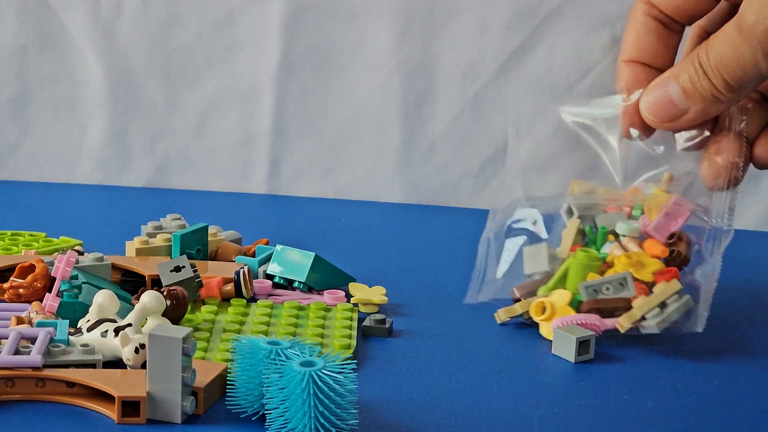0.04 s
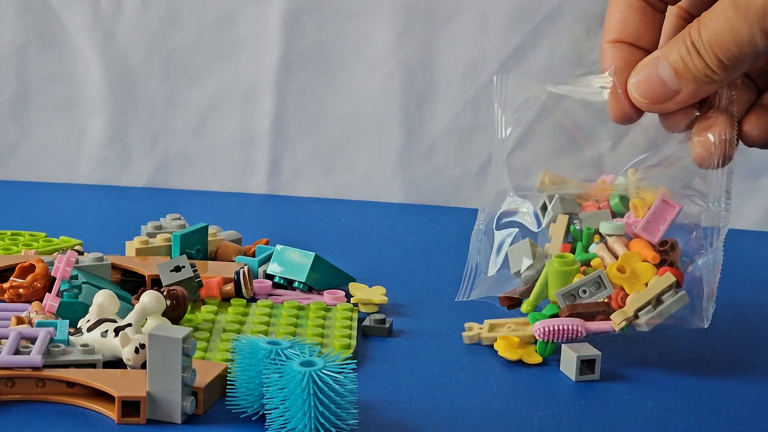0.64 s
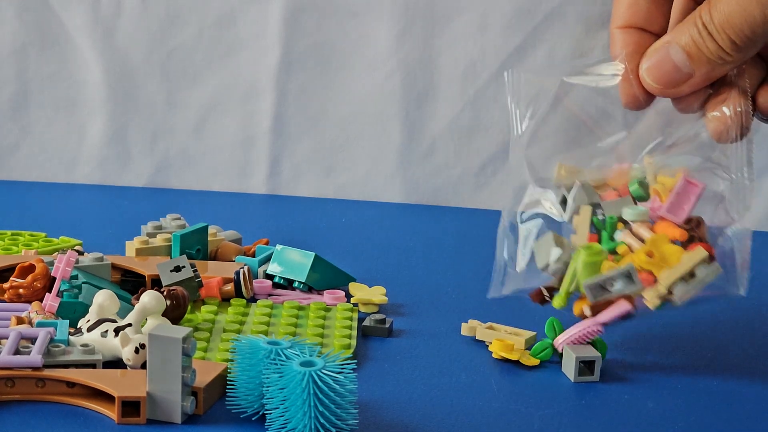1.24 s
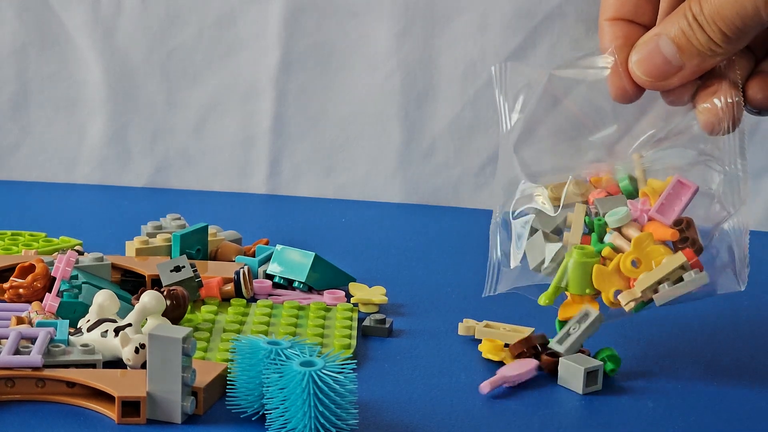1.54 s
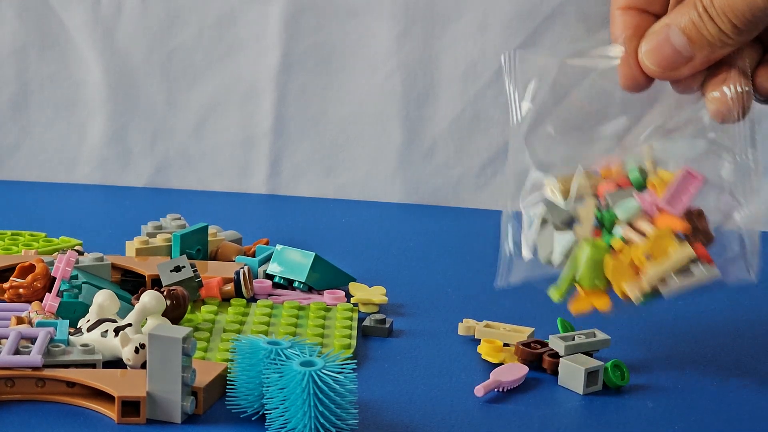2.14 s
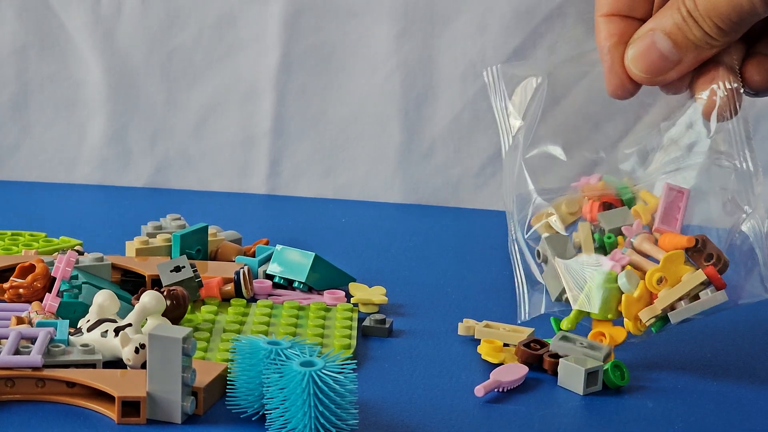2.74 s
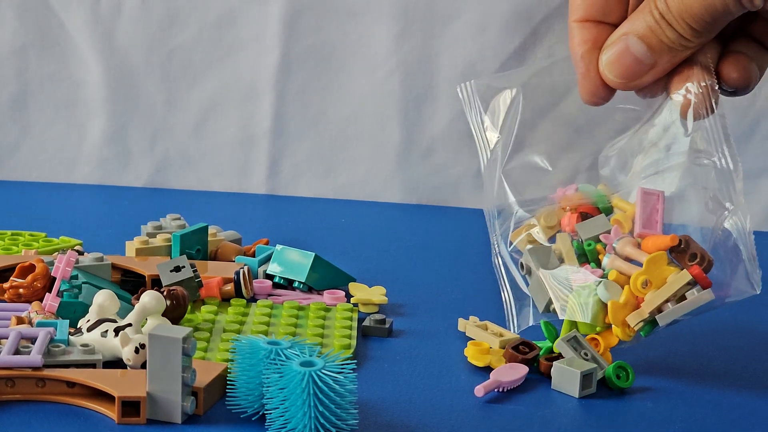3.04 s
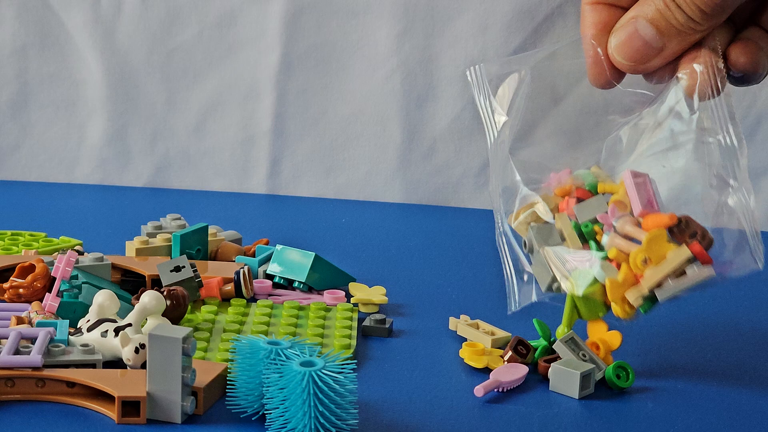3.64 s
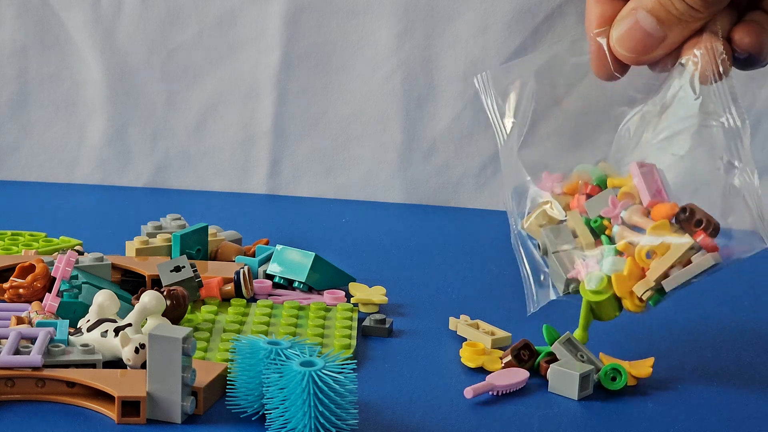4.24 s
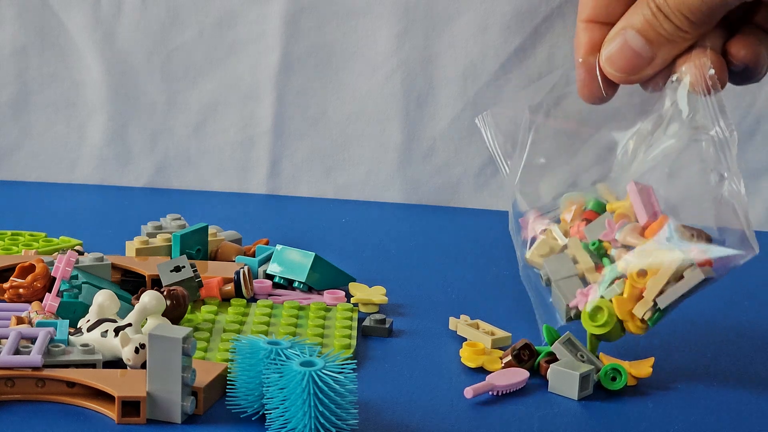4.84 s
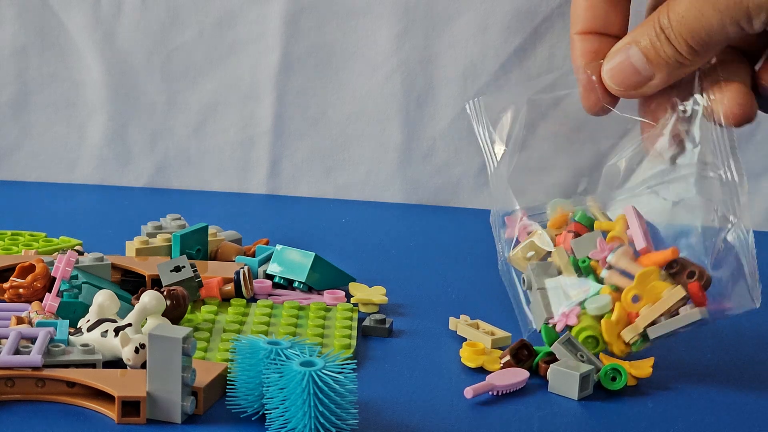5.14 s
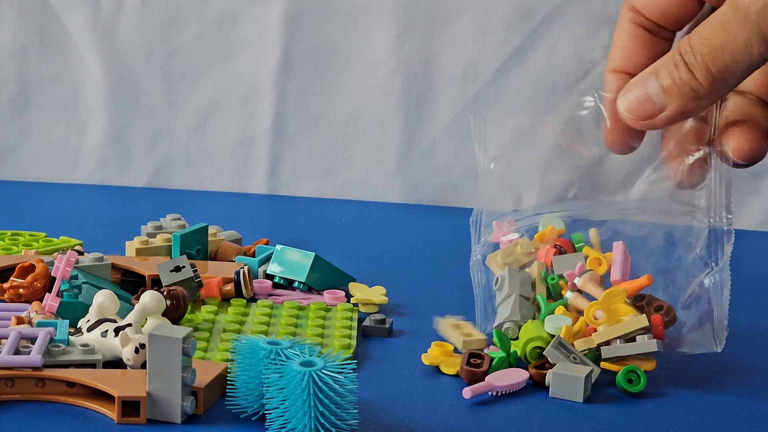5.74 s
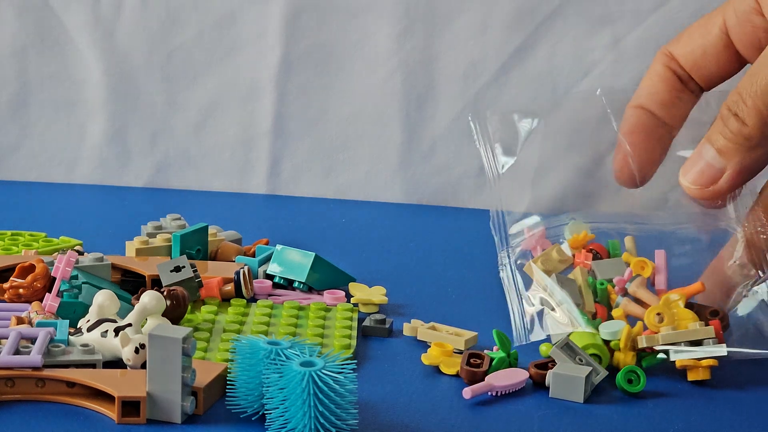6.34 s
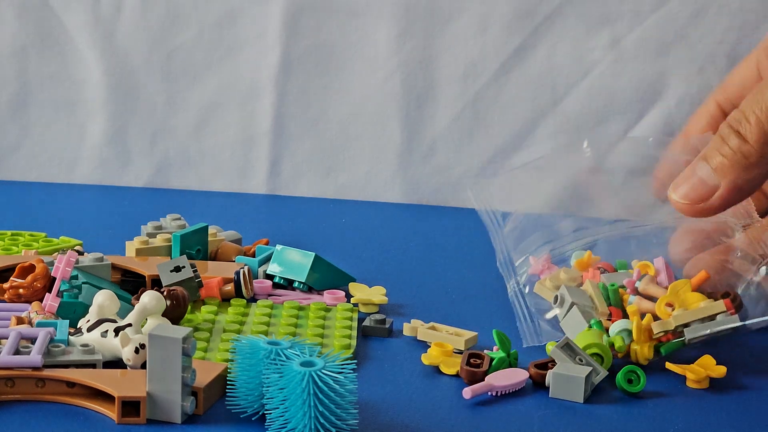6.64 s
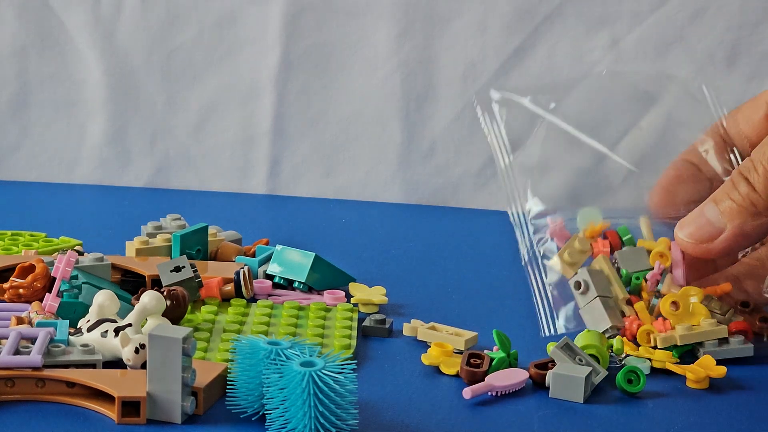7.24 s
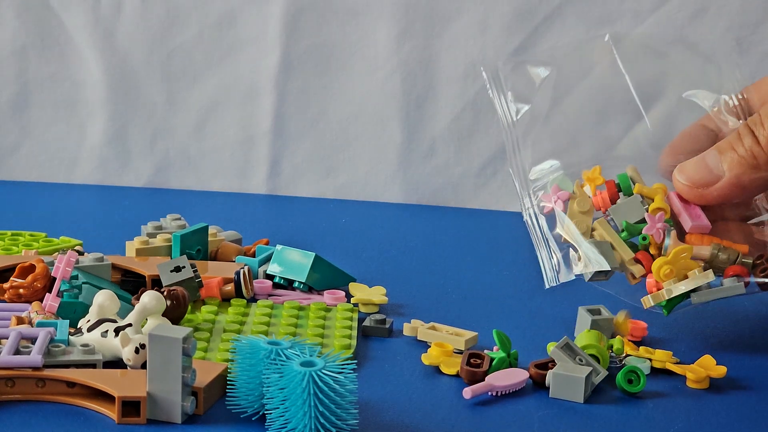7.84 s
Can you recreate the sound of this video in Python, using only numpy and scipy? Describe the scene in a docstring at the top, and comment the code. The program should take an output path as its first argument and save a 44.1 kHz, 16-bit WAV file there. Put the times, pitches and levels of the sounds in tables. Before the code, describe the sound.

Close by, small plastic bricks shift and rattle in a thin bag as it is repeatedly shaken. Pieces spill onto a tabletop a few at a time, with crisp clicks and an occasional soft thud. Sharp crackles from the bag run throughout and grow busier in the second half, before more bricks tumble out. The small room adds a short echo over a steady low rumble and faint hum.

```python
"""A soft rustle starts over a low room rumble and faint hum: a thin plastic bag of toy bricks is being
shaken out just above a tabletop in a small room. Bricks slide and jostle inside, and creases in the film
buckle with sharp snaps. A few bricks drop out and clack with a short ring, twice with a bright treble
sparkle; the load bumps dully on the table, and thin, very high whistles sound during the clatter.
The room adds an early echo and a short diffuse tail."""
import sys
import numpy as np
from scipy import signal
from scipy.fft import rfft, irfft, next_fast_len
from scipy.io import wavfile
from scipy.ndimage import uniform_filter1d

SR = 44100
rng = np.random.default_rng(int(sys.argv[2]) if len(sys.argv) > 2 else 0)


def digitize_waveform(pressure):
    """Quantize a signal to 16-bit integers and store it at the path in sys.argv[1].

    Rows of a 2-D input are taken as channels; values are limited to [-1, 1].
    """
    field = np.atleast_2d(pressure).T
    bounded = np.clip(field, -1, 1)
    quanta = np.round(bounded * 32767).astype(np.int16)
    wavfile.write(sys.argv[1], SR, quanta)


N = 351918
TIME = np.arange(N) / SR

# spectrum of the room's rumble: (frequency [Hz], relative level [dB])
RUMBLE_SPECTRUM = [(16, -10), (30, 1.5), (100, -13), (290, -12.5), (370, -19), (1000, -32.5), (4500, -50.5),
                   (16000, -74)]
# partials of the hum: (frequency [Hz], rms level [dB])
HUM_PARTIALS = [(120, -61.5), (299.5, -58.5)]
# the hand shakes or shifts the bag:
# (time [s], duration [s], level [dB], loose bricks re level [dB], taut film re level [dB])
HAND_SHAKES = [(0.01, 0.059, -42, -2.5, -19), (0.141, 0.043, -37.5, -6, -20),
               (0.278, 0.0098, -40.5, -0.5, -17), (0.47, 0.078, -36.5, 0.5, -11),
               (0.665, 0.074, -38, -4, -24.5), (1.258, 0.12, -43, -0.5, -14),
               (1.462, 0.14, -32.5, -1.5, -13), (1.685, 0.013, -35.5, -6, -16),
               (2.244, 0.046, -53, 5, -3.5), (2.402, 0.12, -60, -7, -4.5), (2.619, 0.29, -39.5, -3, -14.5),
               (3.013, 0.28, -51.5, 2, -42), (3.347, 0.078, -40.5, -5, -30.5), (3.5, 0.17, -50, -5, -34),
               (3.685, 0.056, -40.5, -3.5, -12.5), (3.826, 0.056, -35.5, -6.5, -17.5),
               (4.069, 0.04, -39.5, -7, -16), (4.854, 0.0093, -43, -11, -14), (5.083, 0.12, -36, -4, -12.5),
               (5.288, 0.03, -36, -5.5, -11.5), (5.366, 0.08, -31.5, -8, -14),
               (5.77, 0.086, -35.5, -8.5, -20), (5.954, 0.14, -38.5, -29, -18),
               (6.24, 0.26, -41.5, -29, -25.5), (6.731, 0.3, -41.5, -5.5, -9),
               (6.973, 0.2, -41, -10.5, -12), (7.194, 0.44, -52.5, -30, -19), (7.594, 0.028, -29, -18, -16),
               (7.71, 0.22, -44.5, -10, -11.5)]
# spectra of sliding bricks and of crinkling film: (frequency [Hz], gain [dB])
SLIDE_SPECTRUM = [(130, -26), (240, 11.5), (640, 2.5), (1150, 3), (1650, -4), (2150, 1), (2600, -0.5),
                  (4300, -2), (7500, -20)]
CRINKLE_SPECTRUM = [(2000, -2), (5200, 6), (7300, 5), (9600, -10.5), (12000, 5), (16000, -10)]
# a brick's ring, then two faint high treble tones heard with each contact:
# (frequency [Hz], level [dB], t60 [s])
CONTACT_TONES = [(3647, 3.5, 0.013), (4140, -6.5, 0.011), (5290, -0.5, 0.0044), (11500, -21.5, 0.024),
                 (15400, -28, .008)]
# low modes of the hollow heap of bricks and the tabletop: (frequency [Hz], level [dB], t60 [s])
BODY_MODES = [(232, -6, 0.1), (439, -8, 0.079), (1030, 4.5, 0.015), (1331, -11, 0.086), (2066, 3.5, 0.021)]
# crease snaps; the two rows above 10 kHz are bright treble sparkles on brick clacks:
# (time [s], level [dB], ring frequency [Hz], body trim [dB], crack trim [dB])
SNAPS_AND_SPARKLES = [(0.2121, -36, 4940, -28, 3), (0.352, -30, 3620, -29, -12),
                      (0.386, -38.5, 2290, -0.5, -13), (0.442, -25.5, 3800, -9, -14),
                      (0.4545, -14.5, 3250, -39, -13.5), (0.7741, -23.5, 3960, -21.5, -11),
                      (1.5765, -21, 3660, -15, -14.5), (1.6843, -29.5, 14100, -22, -9),
                      (2.4017, -38.5, 4850, -37, -9.5), (2.6324, -22.5, 4470, -13.5, -16.5),
                      (2.812, -22, 3730, -10.5, -15), (3.0665, -20.5, 3170, -15.5, -11.5),
                      (3.084, -34.5, 3530, -11, -2), (3.4094, -14.5, 3380, -21, -19),
                      (4.024, -30, 3640, -20.5, -17), (4.191, -31.5, 3860, -13, -17.5),
                      (4.75, -33.5, 4640, -21.5, -19), (4.968, -38, 3300, -17, -20),
                      (4.995, -28, 5300, -26, -18), (5.213, -26, 3400, -38, -11),
                      (5.2629, -22.5, 5750, -19, -6.5), (5.374, -30, 5000, -27, -11),
                      (5.4374, -15.5, 3380, -21, -17), (5.467, -26.5, 5000, -20, -12.5),
                      (5.752, -28, 3930, -16.5, -11), (5.87, -27, 5400, -10.5, -3),
                      (5.9545, -19.5, 4500, -18.5, -26), (5.9592, -16.5, 3620, -16.5, -13),
                      (6.0249, -28.5, 3600, -9.5, -22), (6.07, -23, 4200, -30, -3.5),
                      (6.1213, -29, 2750, -4.5, -9), (6.138, -20.5, 3840, -24, -9),
                      (6.369, -28.5, 6400, -11, -7), (6.6076, -8, 4420, -19.5, -20.5),
                      (6.799, -25.5, 3830, -25, -26), (6.8533, -30.5, 4200, -17, -11.5),
                      (6.966, -26.5, 4970, -16, -11), (6.9696, -11.5, 4600, -19.5, -18),
                      (7.0911, -30, 6800, -21, -17), (7.1217, -24.5, 2900, -15.5, -15),
                      (7.2699, -27, 4680, -14, -17), (7.375, -22, 3700, -12, -10.5),
                      (7.451, -29.5, 4430, -8.5, -9.5), (7.5715, -27, 3580, -4.5, -6.5),
                      (7.602, -29.5, 5270, 0, 1.5), (7.8979, -24, 12000, -22, -6.5)]
# a brick comes down on the table: (time [s], level [dB])
BRICK_LANDINGS = [(0.2698, -34), (0.484, -33), (1.433, -33), (1.462, -25.5), (1.5269, -24), (2.697, -33),
                  (2.8648, -30.5), (3.678, -36.5), (3.708, -32.5), (4.0648, -29), (7.5894, -20)]
# the load bumps the table: (time [s], level [dB], centre frequency [Hz])
LOAD_BUMPS = [(0.475, -11.5, 282), (1.503, -16, 240), (4.305, -10.5, 100), (4.391, -17.5, 64.5),
              (5.112, -9.5, 264), (7.589, -19, 295)]
# a brick knocks on another: (time [s], level [dB])
BRICK_CLACKS = [(0.831, -48), (0.9719, -36.5), (1.0146, -39.5), (1.046, -21.5), (1.0564, -32),
                (1.227, -30.5), (1.2525, -25.5), (1.3438, -30.5), (1.3508, -28.5), (1.4785, -21),
                (1.5097, -19.5), (1.569, -32.5), (1.6843, -22.5), (1.7007, -31.5), (2.13, -38),
                (2.16, -35.5), (2.607, -31.5), (2.6751, -33.5), (2.737, -20), (3.1497, -40.5),
                (3.2331, -44), (3.2665, -46), (3.3432, -39), (3.4993, -33.5), (3.616, -38), (7.723, -34.5),
                (7.7674, -30), (7.782, -29.5), (7.832, -21.5), (7.8964, -24.5), (7.919, -35)]
# thin, very high whistles during the clatter: (time [s], level [dB], centre frequency [Hz])
HIGH_WHISTLES = [(1.477, -7, 15400), (1.686, -19, 15400), (2.401, -18, 11800), (2.494, -24, 12200),
                 (3.86, -22, 12000), (4.785, -29.5, 7360)]
# left-right coherence of the direct sound and of the room: (frequency [Hz], coherence [0-1])
BAG_COHERENCE = [(3500, 0.77), (6000, 0.75), (9000, 0.024)]
ROOM_COHERENCE = [(200, 0.95), (850, 0.12), (3000, 0)]
# stereo balance of the bag's sound: (frequency [Hz], left minus right [dB])
BAG_BALANCE = [(1000, -3), (5000, -3.5), (9000, -4), (13000, -1.5)]
# the bag is moved to the right and back: (time [s], added left minus right [dB])
BAG_PATH = [(6.2, 6), (6.6, 2.5), (7.6, 5.2)]
# reflection from a near surface: (delay [s], level [dB])
EARLY_ECHOES = [(0.0098, -11)]
# reverberation time: (frequency [Hz], t60 [s])
TAIL_DECAY = [(3700, 0.26), (12000, 0.09)]
# strength of the diffuse tail: (frequency [Hz], gain [dB])
TAIL_GAIN = [(3700, 2.23), (12000, 2.8)]


def from_db(db):
    """Amplitude ratio of a level in decibels."""
    return 10 ** (np.asarray(db) / 20)


def decay(t, t60):
    """Exponential damping: the amplitude falls 60 dB in t60 seconds."""
    return from_db(-60 * t / t60)


def rms_one(x):
    """Normalisation to unit mean power."""
    return x / np.sqrt(np.mean(x ** 2) + 1e-20)


def unit_energy(x):
    """Normalisation of a transient to unit energy."""
    return x / np.sqrt(np.sum(x ** 2) + 1e-20)


def at_hz(points, hz):
    """Interpolation of a table on a log-frequency axis."""
    freqs, values = np.transpose(points)
    return np.interp(np.log(hz + 1e-9), np.log(freqs), values)


def colour(x, spectrum):
    """Minimum-phase filtering: folding the cepstrum makes the given spectrum causal."""
    size = next_fast_len(N + SR // 4)
    gain = from_db(at_hz(spectrum, np.fft.rfftfreq(size, 1 / SR)))
    cepstrum = irfft(np.log(gain), size)
    cepstrum[1:size // 2] *= 2
    cepstrum[size // 2 + 1:] = 0
    return irfft(rfft(x, size) * np.exp(rfft(cepstrum)), size)[..., :N]


def spread(pair, coherence, balance=((1000, 0),)):
    """Partial coherence: two uncorrelated signals mix as mid and side into left and right."""
    size = next_fast_len(N)
    hz = np.fft.rfftfreq(size, 1 / SR)
    alike = np.clip(at_hz(coherence, hz), -1, 1)
    sides = np.array([[1], [-1]])
    mid, side = rfft(pair, size)
    stereo = np.sqrt((1 + alike) / 2) * mid + sides * np.sqrt((1 - alike) / 2) * side
    return irfft(stereo * from_db(sides * at_hz(balance, hz) / 2), size)[:, :N]


def band(x, low_hz, high_hz):
    """Causal band-pass filtering."""
    edges = np.clip([low_hz, max(high_hz, low_hz + 100)], [10, 20], [.44 * SR, .45 * SR])
    return signal.sosfilt(signal.butter(2, edges, "band", fs=SR, output="sos"), x)


def add(track, s, sound):
    """Superposition of a sound on a track at s seconds."""
    start = max(round(s * SR), 0)
    track[..., start:start + sound.shape[-1]] += sound[..., :N - start]


def struck(tones, detune):
    """Damped sinusoids, as a quadrature pair: each blow shifts their frequencies a little."""
    hz, db, t60 = np.transpose(tones)[:, :, None]
    t = TIME[:SR // 5]
    hz = hz * (1 + detune * rng.standard_normal(hz.shape))
    strength = from_db(db) * rng.choice([-1, 1], hz.shape)
    rings = np.sum(strength * decay(t, t60) * np.exp(2j * np.pi * hz * t), axis=0)
    return np.array([unit_energy(rings.imag), unit_energy(rings.real)])


def pressed(sound, press_s):
    """Contact compliance: the sound builds up as a corner digs in."""
    return sound * (1 - np.exp(-TIME[:sound.shape[-1]] / press_s))


def burst(low_hz, high_hz, t60, rise_s=0.000093):
    """Band-limited noise that swells and decays exponentially; an uncorrelated pair."""
    t = TIME[:SR // 5]
    rise = 1 - np.exp(-t / rise_s)
    noise = rng.choice([-1, 1], (2, len(t))) * rise * decay(t, t60) + 1e-18
    return np.array([unit_energy(row) for row in band(noise, low_hz, high_hz)])


def grains(stock, per_s, scatter_db):
    """Shot noise: contacts of uneven size at random times, each drawn from a stock of sounds; rms 1."""
    onsets = rng.random(N) < per_s / SR
    sizes = onsets * from_db(scatter_db * np.minimum(rng.exponential(1, N), 3))
    # the hand feeds in energy steadily, however it is shared among the contacts
    sizes /= np.sqrt(np.abs(uniform_filter1d(sizes ** 2, size=SR // 14)) + per_s / SR)
    picks = rng.integers(0, len(stock), N)
    out = np.zeros((2, N))
    for at in np.flatnonzero(onsets):
        add(out, at / SR, sizes[at] * stock[picks[at]])
    return rms_one(out)


def rumble_and_hum(rumble_db=-44.5):
    """Stationary room noise: a continuous spectrum, strongest in the bass, plus two faint pure tones."""
    noise = rms_one(colour(rng.standard_normal((2, N)), RUMBLE_SPECTRUM))
    rumble = from_db(rumble_db) * spread(noise, ROOM_COHERENCE)
    hum = sum(from_db(db) * np.sqrt(2) * np.sin(2 * np.pi * (hz * TIME + rng.random()))
              for hz, db in HUM_PARTIALS)
    return rumble * from_db([[.6], [-.6]]) + hum   # the rumble leans left


def shake(start, length, attack_s=0.018, sag_db_per_s=6, settle_db_per_s=256):
    """Exponential growth and decay: the load gathers speed, loses vigour while shaken, then settles."""
    t = TIME - start
    swell = np.exp(np.minimum(t, 0) / attack_s)
    sag_db = sag_db_per_s * np.clip(t, 0, length)
    settle_db = settle_db_per_s * np.maximum(t - length, 0)
    return swell * from_db(-sag_db - settle_db)


def vigour():
    """Incoherent addition: shakes sum in power to give the gains of sliding, jostling and crinkling."""
    power = np.zeros((3, N))
    for start, length, db, loose_db, taut_db in HAND_SHAKES:
        gains = from_db(db + np.array([[0], [loose_db], [taut_db]]))
        power += (gains * shake(start, length)) ** 2
    return np.sqrt(power)


def sliding(t60=0.007, count=256):
    """Sliding friction: bricks on film make dense broadband ticks, shaped by resonances; rms 1."""
    t = TIME[:SR // 60]
    ticks = rng.standard_normal((count, 2, len(t))) * decay(t, t60)
    return rms_one(colour(grains(ticks, per_s=1100, scatter_db=1.0), SLIDE_SPECTRUM))


def crinkles(width=1.63, count=128):
    """Local buckling: small facets of the film flick over, each in a band of its own; rms 1."""
    centres_hz = np.linspace(1500, 15500, count)
    flicks = [burst(hz / width, hz * width, t60=0.0035)[:, :SR // 60] for hz in centres_hz]
    return rms_one(colour(grains(flicks, per_s=900, scatter_db=7.0), CRINKLE_SPECTRUM))


def catches(per_s=40, depth=1.9, t60=0.057):
    """Stick-slip: the load catches and lets go at random, each release a jump in a gain of rms near 1."""
    releases = (rng.random(N) < per_s / SR) * rng.exponential(1, N)
    energy = np.minimum(releases, 2) ** 2 + 1e-18
    power = 1 + depth ** 2 * signal.lfilter([1], [1, -decay(1 / SR, t60) ** 2], energy)
    return np.sqrt(power / uniform_filter1d(power, size=SR // 10))


def nudges(body_db=-6.0, count=64):
    """Soft impacts: loose bricks sound only the low part of their ring and stir the hollow heap; rms 1."""
    taps = []
    for _ in range(count):
        brick = struck(CONTACT_TONES[:2], detune=0.045)
        heap = from_db(body_db) * struck(BODY_MODES[2:], detune=0.069)
        taps.append(pressed(brick + heap, press_s=0.0008))
    return grains(taps, per_s=220, scatter_db=3.5)


def rustling(slide_db=-8.0, jostle_db=-5.0, crinkle_db=1.5):
    """Amplitude modulation: shakes drive three noises; stick-slip roughens the sliding and crinkling."""
    motion, loose, taut = vigour()
    slide = from_db(slide_db) * motion * sliding()
    crinkle = from_db(crinkle_db) * taut * crinkles()
    return catches() * (slide + crinkle) + from_db(jostle_db) * loose * nudges()


def snaps_and_sparkles(pop_db=9.0, body_db=23.0, crack_db=22.5, width=1.21):
    """Transients: buckling creases pop, ring and crack; the two highest sounds are sparkles on clacks."""
    out = np.zeros((2, N))
    for s, db, hz, body_trim, crack_trim in SNAPS_AND_SPARKLES:
        low, high = hz / width, hz * width
        pop = from_db(pop_db) * unit_energy(band(signal.unit_impulse(SR // 100), low, high))
        ring = burst(low, high, t60=0.02)
        midrange = burst(948, 2790, t60=0.012)
        load = .5 * struck(BODY_MODES[-1:], detune=0.037)
        body = from_db(body_db + body_trim) * (midrange + load)
        crack = from_db(crack_db + crack_trim) * burst(3500, 14600, t60=0.01)
        add(out[0], s, from_db(db) * pop)   # mid only: the pop is coherent in left and right
        add(out, s, from_db(db) * (ring + body + crack))
    return out


def landings(ring_db=21.0, knock_db=16.5):
    """Impact excites both bodies: the falling brick rings and the tabletop knocks."""
    out = np.zeros((2, N))
    for s, db in BRICK_LANDINGS:
        ring = from_db(ring_db) * struck(CONTACT_TONES, detune=0.038)
        knock = from_db(knock_db) * struck(BODY_MODES, detune=0.025)
        add(out, s, from_db(db) * pressed(ring + knock, press_s=0.0001))
    return out


def bumps():
    """Cushioned impact: many bricks settle at once on the film, giving a dull thud an octave wide."""
    out = np.zeros((2, N))
    for s, db, hz in LOAD_BUMPS:
        add(out, s, from_db(db) * burst(hz / np.sqrt(2), hz * np.sqrt(2), t60=0.11, rise_s=0.021))
    return out


def clacks(ring_db=19.0, heap_db=6.5, tick_db=2.0, press_s=0.00016, gap_s=0.004, loss_db=7.5):
    """Inelastic rebound: brick ticks on brick and chatters, ever weaker; the heap answers faintly."""
    out = np.zeros((2, N))
    for s, db in BRICK_CLACKS:
        heap = from_db(heap_db) * struck(BODY_MODES, detune=0.021)
        tick = from_db(tick_db) * burst(3000, 12000, t60=0.016)
        add(out, s, from_db(db) * pressed(heap + tick, press_s))
        for k in range(3):   # each touch rings at a slightly different pitch
            touch = pressed(struck(CONTACT_TONES, detune=0.015 * (1 + k)), press_s)
            delay = k * gap_s * (1 + rng.random() / 2)
            add(out, s + delay, from_db(db + ring_db - k * loss_db) * touch)
    return out


def whistles(width=1.025):
    """Narrow-band noise is heard as a pitch: brief, thin, very high whistles during the clatter."""
    out = np.zeros((2, N))
    for s, db, hz in HIGH_WHISTLES:
        add(out, s, from_db(db) * burst(hz / width, hz * width, t60=0.085, rise_s=0.0029))
    return out


def reflections(onset_s=0.0032):
    """Room impulse response: an early echo and a diffuse tail that dies sooner in the treble."""
    t = TIME[:SR // 3]
    edges_hz = np.geomspace(100, 18000, num=9)
    response = np.zeros((2, len(t)))
    for low, high in zip(edges_hz, edges_hz[1:]):
        hz = np.sqrt(low * high)
        tail = band(rng.standard_normal(response.shape), low, high) * decay(t, at_hz(TAIL_DECAY, hz))
        tail *= np.minimum(t / onset_s, 1) ** 2
        response += unit_energy(tail) * np.sqrt((high - low) / SR) * from_db(at_hz(TAIL_GAIN, hz))
    for delay, db in EARLY_ECHOES:
        add(response, delay, from_db(db) * burst(370, 13000, t60=0.0027))
    return response


def room(x, stretches=16):
    """Time-varying convolution: the bag moves, so each stretch of its sound meets other reflections."""
    out = np.zeros((2, N))
    for part in np.array_split(np.arange(N), stretches):
        add(out, part[0] / SR, signal.fftconvolve(x[:1, part], reflections(), axes=1))
    return spread(out, ROOM_COHERENCE, BAG_BALANCE)


def scene(bright_send_db=-4.5, rustle_send_db=-3.0):
    """Superposition of the nearby bag's direct sound, its reverberant field and the room's own noise."""
    bright = snaps_and_sparkles() + whistles()
    bricks = clacks() + landings() + bumps()
    rustle = rustling()
    pan_db = np.interp(TIME, *np.transpose(BAG_PATH))
    pan = from_db(pan_db * np.array([[1], [-1]]) / 2)
    direct = pan * spread(bright + bricks + rustle, BAG_COHERENCE, BAG_BALANCE)
    radiated = from_db(bright_send_db) * bright + bricks + from_db(rustle_send_db) * rustle
    return direct + room(radiated) + rumble_and_hum()


def record(dry, cutoff_hz=15850):
    """Band limiting: an elliptic low-pass cuts the top treble steeply."""
    return signal.sosfilt(signal.ellip(10, .2, 90, cutoff_hz, fs=SR, output="sos"), dry)


dry = scene()
out = record(dry)
digitize_waveform(out)
```